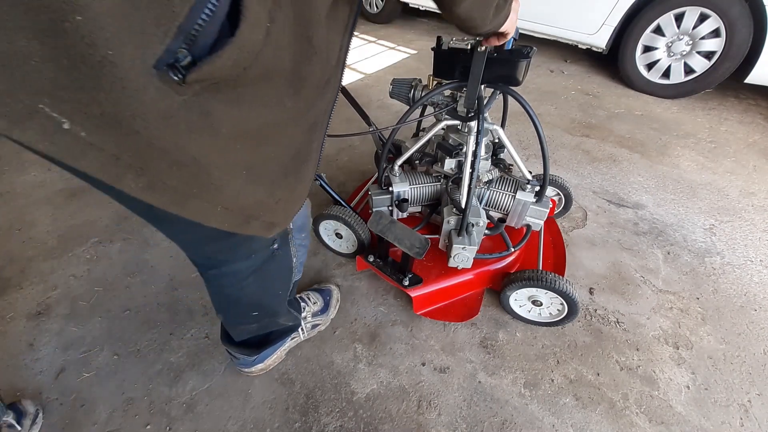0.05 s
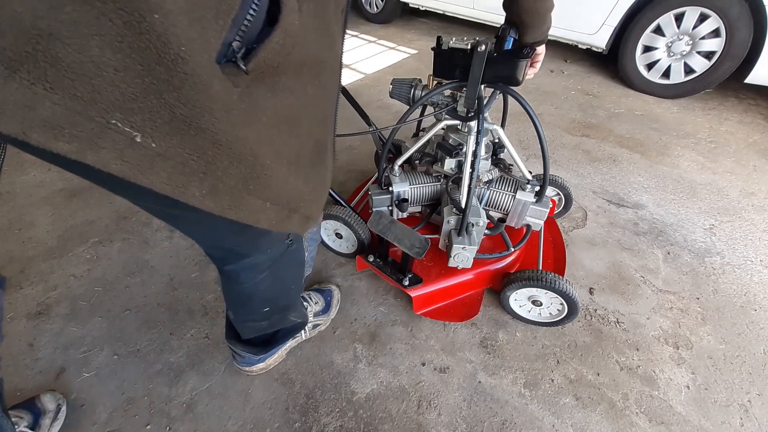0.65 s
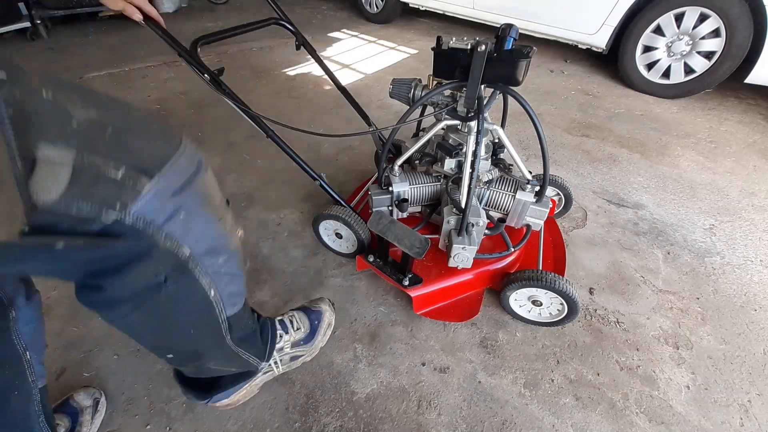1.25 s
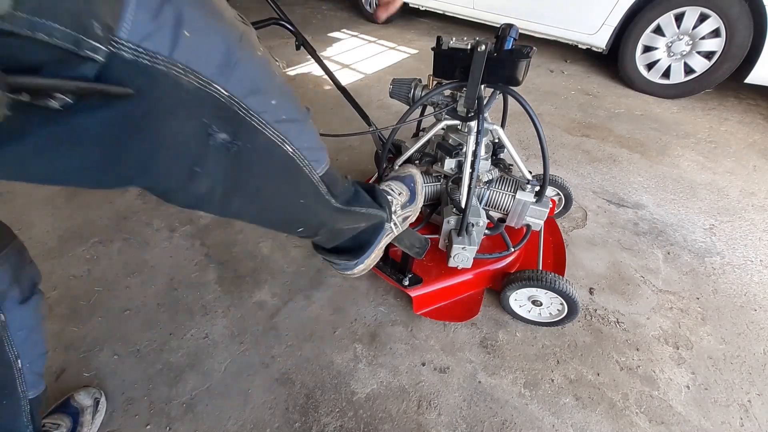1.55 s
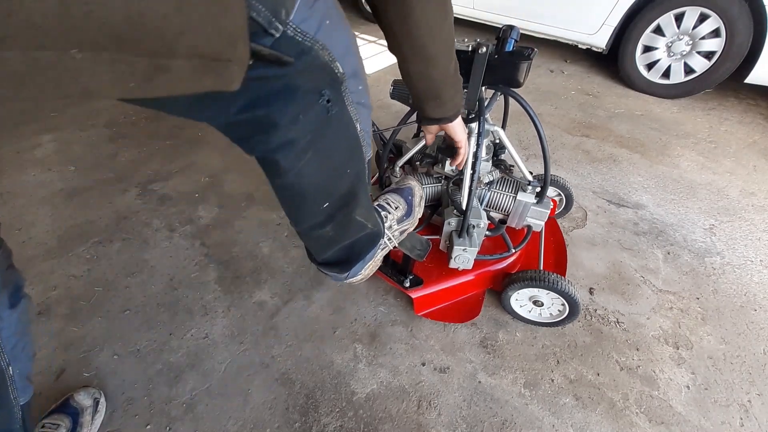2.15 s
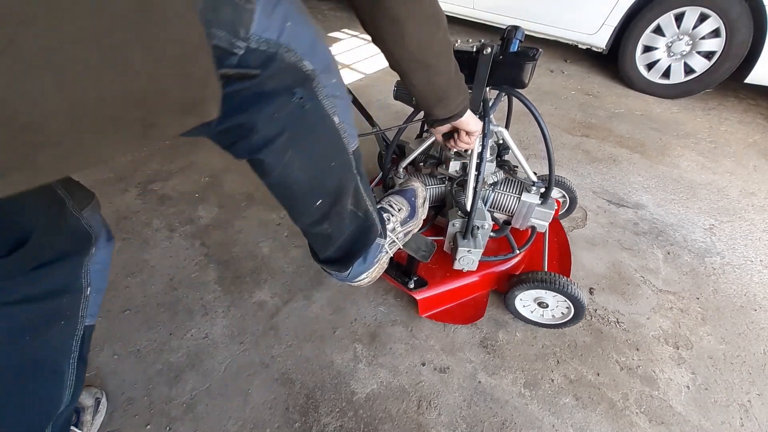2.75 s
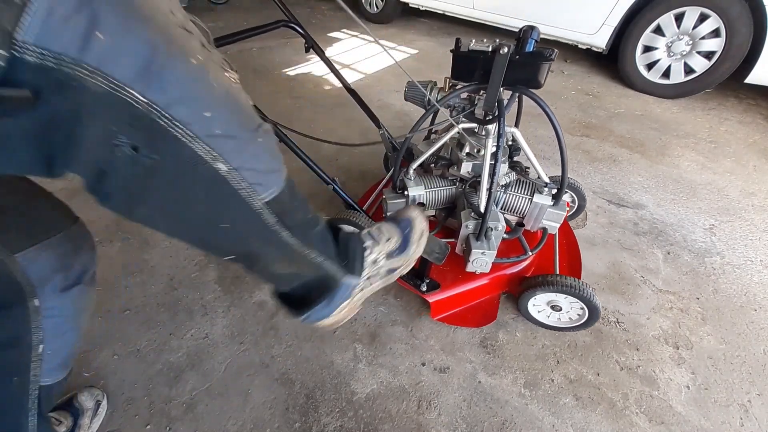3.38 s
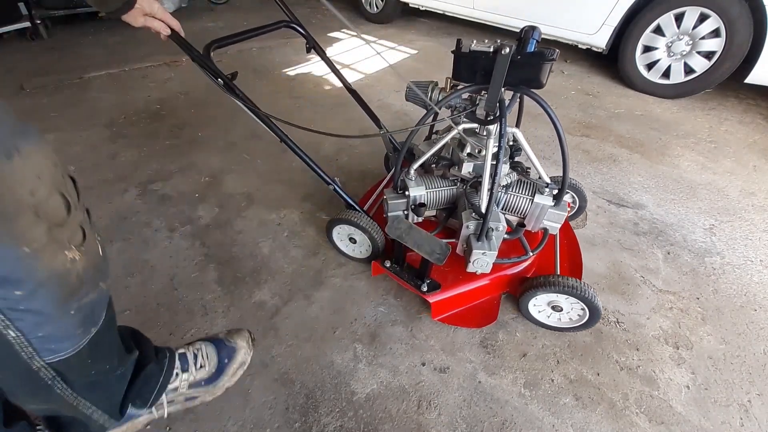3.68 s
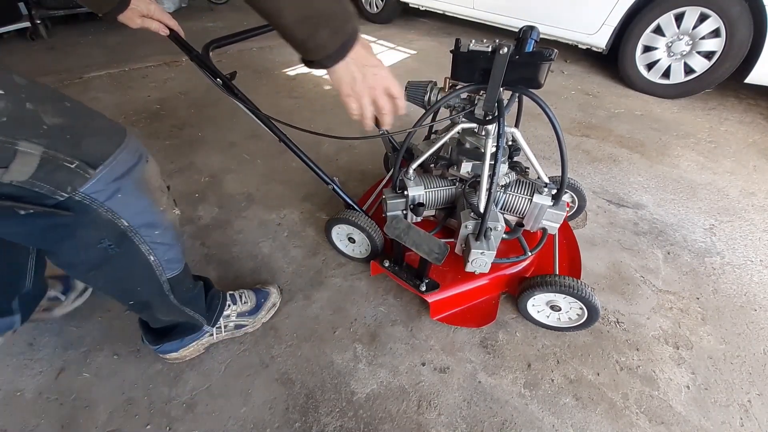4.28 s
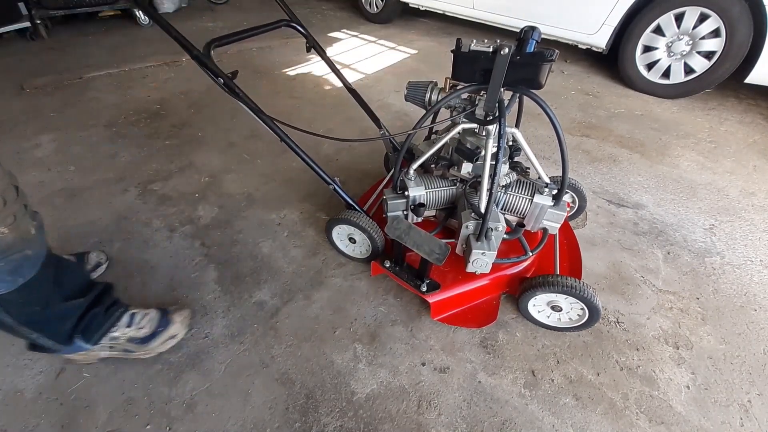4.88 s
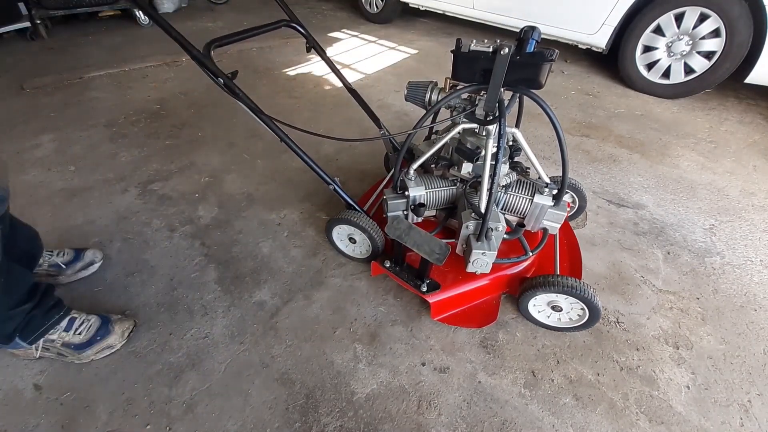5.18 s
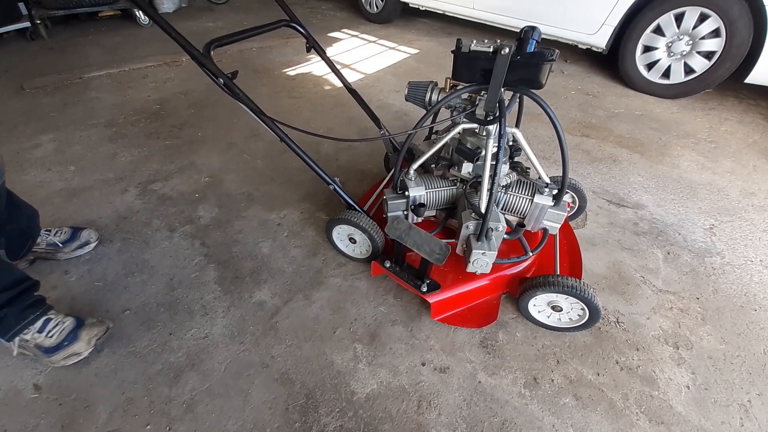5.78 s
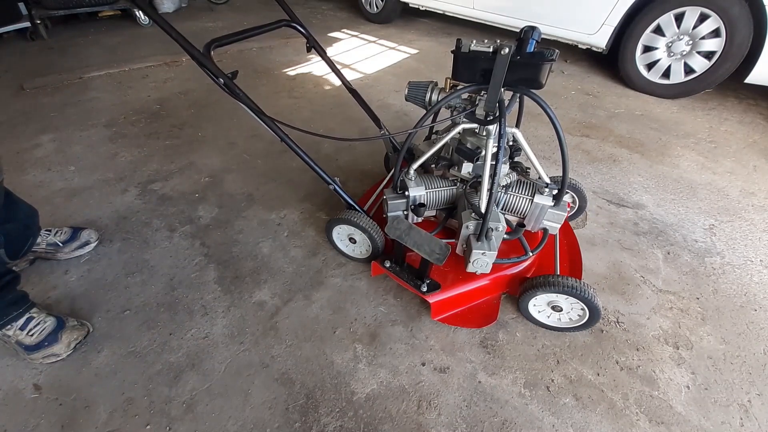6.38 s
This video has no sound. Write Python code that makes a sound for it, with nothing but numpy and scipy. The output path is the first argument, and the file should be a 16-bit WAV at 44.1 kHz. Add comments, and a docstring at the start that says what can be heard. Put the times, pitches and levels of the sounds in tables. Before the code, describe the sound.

A quiet garage with a faint hum opens with a small switch click at 0.1 seconds and soft clothing rustle. At 1 second a lawn mower's tubular handle clacks and rings briefly. Around 1.6 seconds a shoe lands on the steel deck with a light ringing knock. From 2.5 to 3 seconds the starter ticks and clinks as the slack is taken up, slightly to the left. The cord is drawn out with a rasping whizz until about 3.3 seconds, while the engine chuffs. Single loud firings start at around 3.1 seconds and come closer together. At 3.5 seconds the engine catches and climbs in speed, levelling off around 5 seconds into a loud, rapid, hissing clatter over a low drone. Concrete walls smear it into a wide roar, with irregular sharp bangs cutting through. It is still running at the end, near 6.6 seconds.

```python
"""Radial mower engine, pull-started in a garage.

A switch clicks, the handle clacks, a shoe lands on the steel deck and the starter cord is drawn out.
The homemade five-cylinder engine chuffs, fires single shots, catches and runs up on open exhaust
stubs, one cylinder weak. Bare concrete walls smear the firings into a roar over a rising drone;
a few hard firings bang through."""
import sys
import numpy as np
from scipy import signal
from scipy.fft import rfft, irfft, next_fast_len
from scipy.io import wavfile
from scipy.ndimage import map_coordinates

SR = 44100
rng = np.random.default_rng(int(sys.argv[2]) if len(sys.argv) > 2 else 0)


def wav_record(signal):
    """Record a signal, one row per channel, as 16-bit PCM in the file named by sys.argv[1]."""
    frames = np.transpose(np.atleast_2d(signal))
    bounded = np.clip(frames, -1, 1)
    # unit amplitude maps onto the largest positive 16-bit level
    quanta = np.round(bounded * 32767).astype(np.int16)
    wavfile.write(sys.argv[1], SR, quanta)


N = 292383
TIME = np.arange(N) / SR
FULL_RATE_HZ = 91.089  # firings at full speed
# compression strokes under the cord: t/s, puff/dB, f/Hz, t60/s, pulley rattle/dB
COMPRESSIONS = [(3.013, -23.5, 162, 0.1, -32), (3.041, -26, 195, 0.04, -40),
                (3.132, -14.5, 152, 0.043, -33), (3.138, -19.5, 574, 0.047, -22),
                (3.199, -16, 242, 0.058, -18.5), (3.216, -15.5, 300, 0.06, -15.5),
                (3.24, -10, 62, 0.043, -40), (3.274, -17.5, 224, 0.036, -38)]


def amp(db):
    """Decibels to gain."""
    return 10 ** (np.asarray(db) / 20)


def pan(db):
    """Stereo gains: left up, right down by db."""
    return amp([[db], [-db]])


def unit(x):
    """x at rms 1."""
    return x / np.sqrt(np.mean(x ** 2) + 1e-20)


def along(points, hz):
    """Interpolate (f/Hz, value) points on a log axis."""
    f, v = np.transpose(points)
    return np.interp(np.log(hz + 1), np.log(f + 1), v)


def fade_in(full_s, fade_s):
    """Linear ramp reaching 1 at full_s."""
    return np.clip(1 + (TIME - full_s) / fade_s, 0, 1)


def wobble(rate_hz):
    """Smooth random curve, rate_hz knots a second."""
    return map_coordinates(rng.standard_normal(int(N * rate_hz / SR) + 4), [TIME * rate_hz])


def dying(kicks, decay_s, rise_s=0.00001):
    """Rms envelope of a train of kicks, each swelling and dying away."""
    t = np.arange(SR // 2) / SR
    fall = np.exp(-2 * t / decay_s) * (1 - np.exp(-t / rise_s)) ** 2
    return np.sqrt(np.abs(signal.fftconvolve(kicks ** 2, fall / fall.sum())[:N]))


def swells(events, rise_s, t60_s):
    """Envelope of (t/s, level/dB) events that rise and decay alike."""
    ages = [(np.maximum(TIME - s, 0), db) for s, db in events]
    powers = ((amp(db - 60 * age / t60_s) * (1 - np.exp(-age / rise_s))) ** 2 for age, db in ages)
    return np.sqrt(sum(powers))


def add(track, s, sound):
    """Mix a sound into a track at time s."""
    part = track[..., max(round(s * SR), 0):][..., :sound.shape[-1]]
    part += sound[..., :part.shape[-1]]


def split(x, hz):
    """Low and high bands of x, equal in power at hz."""
    return [signal.sosfilt(signal.butter(2, hz, kind, fs=SR, output="sos"), x)
            for kind in ("low", "high")]


def coloured(x, db_of, size=8192):
    """Minimum-phase filter of unit energy, shaped by db_of(hz)."""
    db = db_of(np.fft.rfftfreq(size, 1 / SR))
    cepstrum = irfft(np.log(np.maximum(amp(db - db.max()), 1e-5)))
    cepstrum[1:size // 2] *= 2
    cepstrum[size // 2 + 1:] = 0
    h = irfft(np.exp(rfft(cepstrum)))
    return signal.fftconvolve(np.atleast_2d(x), h[None] / np.linalg.norm(h), axes=1)[:, :x.shape[-1]]


def wide_noise(size):
    """White stereo noise; bass spread wide, partly in antiphase."""
    # stereo width: f/Hz, left-right correlation
    correlation = [(60, -0.44), (130, 0.03), (290, 0.17), (640, 0.26), (1400, -0.0087), (15000, -0.019)]
    m = next_fast_len(size)
    angle = np.arccos(along(correlation, np.fft.rfftfreq(m, 1 / SR))) / 2
    mid, side = irfft(rfft(rng.standard_normal((2, m))) * [np.cos(angle), np.sin(angle)], m)
    return np.array([mid + side, mid - side])[:, :size]


def garage(x, wet_db, build_s=0.0029):
    """Source plus wall reverberation, a new tail for each position."""
    # room decay: f/Hz, t60/s
    decay = [(100, 0.68), (500, 0.85), (3000, 0.53), (8000, 0.74), (15000, 0.34)]
    hz, t, spectra = signal.stft(wide_noise(SR * 3 // 4), SR, nperseg=256)
    tail = signal.istft(spectra * amp(-60 * t / along(decay, hz)[:, None]), SR, nperseg=256)[1]
    tail *= 1 - np.exp(-(np.arange(tail.shape[1]) / SR / build_s) ** 2)
    tail /= np.linalg.norm(tail[0])
    return x + amp(wet_db) * signal.fftconvolve(np.atleast_2d(x), tail, axes=1)[:, :N]


def clacks(contacts, t60_s, knock_db):
    """Hard parts meet: short cracks, a dull knock below and a bright tick above."""
    # contact spectrum: f/Hz, level/dB
    colour = [(60, -9), (150, -10), (300, -14), (530, -1.5), (750, -4), (1200, -2.5), (1700, -3), (2750, 2),
              (4200, -5), (8000, -11.5), (13800, -17.5), (15800, -20)]
    track, t = np.zeros((2, N)), np.arange(SR // 6) / SR
    for s, db, bright_db in contacts:
        knock, rest = split(amp(db - 60 * t / t60_s) * wide_noise(len(t)), 2500)
        body, tick = split(rest, 7000)
        add(track, s, amp(knock_db) * knock - body + amp(bright_db) * tick)
    return garage(coloured(track, lambda hz: along(colour, hz)), wet_db=-4)


def struck(blows, modes, wet_db, attack_s):
    """Each blow rings the same modes; where it lands tilts them high or low."""
    track, t = np.zeros(N), np.arange(SR) / SR
    middle = np.mean([np.log2(hz) for hz, *_ in modes])
    for s, db, tilt in blows:
        ring = np.zeros(len(t))
        for hz, mode_db, t60_s in modes:
            start_db = mode_db + tilt * (np.log2(hz) - middle) + rng.normal(0, 0.84)
            ring += amp(start_db - 60 * t / t60_s) * np.sin(2 * np.pi * hz * t)
        add(track, s, amp(db) * (1 - np.exp(-t / attack_s)) * ring)
    return garage(track, wet_db)


def room_tone():
    """Quiet air, a wavering hum and a faint fading ring."""
    # room noise: f/Hz, level/dB
    ambient = [(15, -55), (30, -30), (47, 2.5), (86, -11), (133, -8.5), (241, -9.5), (284, -9.5),
               (542, -14), (587, -12.5), (791, -12), (1390, -18), (1780, -18.5), (15800, -51)]
    # hum tones, the close pair beating: f/Hz, level/dB
    hum_tones = [(84.5, -69.5), (74, -69.5), (167, -76.5)]
    # hum swell: t/s, level/dB
    hum_swell = [(0.1, 3), (0.4, -5), (0.8, -1), (1.25, 3.5), (1.65, -5), (2.0, 7), (2.45, 1.5), (2.85, -6)]
    # metallic tones: f/Hz, level/dB, t60/s
    ring_tones = [(1390, -67.5, 5.6), (580, -68.5, 18)]
    air = amp(-59) * coloured(wide_noise(N), lambda hz: along(ambient, hz))
    swell_db = 5.5 + np.interp(TIME, *np.transpose(hum_swell))
    hum = sum(amp(db + swell_db + 2.4 * wobble(4.6)) * np.sin(2 * np.pi * hz * TIME + 1.2 * wobble(5.7))
              for hz, db in hum_tones)
    ring = sum(amp(db - 60 * TIME / t60_s) * np.sin(2 * np.pi * hz * TIME + 0.83 * wobble(22))
               for hz, db, t60_s in ring_tones)
    return air + hum + ring


def clothes(still_db=-66):
    """Cloth rustles with each movement."""
    # movements: centre/s, half length/s, level/dB
    moves = [(.41, 0.13, -61.5), (0.716, .06, -63), (1.211, 0.13, -57), (1.912, 0.078, -54), (2.3, 1, -58)]
    # rustle spectrum: f/Hz, level/dB
    cloth = [(410, -41), (700, -15), (1100, -15), (1380, -7), (2230, -3), (4460, -4.5), (12000, -12),
             (15800, -9)]
    power = sum(amp(db) ** 2 * np.exp(-((TIME - s) / half_s) ** 2) for s, half_s, db in moves)
    level = np.sqrt(amp(still_db) ** 2 + power) * amp(0.8 * wobble(29.5))
    return level * coloured(wide_noise(N), lambda hz: along(cloth, hz))


def shoe():
    """A sole slaps the steel deck and sets it ringing."""
    # sole contact: t/s, level/dB, brightness/dB
    slap = [(1.645, -44.5, -1)]
    # landing and bearing down: t/s, level/dB, tilt/(dB/octave)
    steps = [(1.645, -50, 8), (1.6735, -45, 0), (2.56, -49, 5), (2.588, -51, 5), (2.925, -46, -7)]
    # deck modes: f/Hz, level/dB, t60/s
    deck = [(239.5, -1, 0.61), (251, -5, 0.33), (168, -12.5, 1.5), (293, 4.5, 0.13), (357, -2.5, 0.14),
            (535, -7, 0.072), (136, -7, .05)]
    return clacks(slap, t60_s=0.035, knock_db=5.5) + struck(steps, deck, wet_db=-8, attack_s=0.0013)


def handle(ring_db=-17):
    """The handle's tubes clack together and ring."""
    # tube contacts: t/s, level/dB, brightness/dB
    contacts = [(0.98, -35.5, -9), (.99, -37, -2), (1.0, -35.5, -1), (1.006, -36, 0), (1.011, -32.5, 8),
                (1.051, -43, 3), (1.06, -46.5, 19)]
    # tube modes: f/Hz, level/dB, t60/s
    tubes = [(134, -3, .12), (470, -3, .07), (537, 3, 0.18), (1203, -2.5, 0.27), (2400, -2, .09),
             (2700, 7, .08), (2840, 6, .07), (3110, 2, .1), (3600, -6, .13)]
    blows = [(s, db + ring_db, 0) for s, db, _ in contacts]
    return clacks(contacts, t60_s=0.053, knock_db=3.5) + struck(blows, tubes, wet_db=-3, attack_s=0.0008)


def ticks():
    """Switch, starter grip and pawls tick on contact."""
    # contacts: t/s, level/dB, brightness/dB
    contacts = [(.0805, -47, 13.5), (.106, -45, -5), (2.459, -50.5, 15), (2.566, -35, 2), (2.589, -38, 2),
                (2.663, -56, 24), (2.671, -43, 3), (2.709, -35, 6.5), (2.838, -62, 22), (2.847, -55, 19),
                (2.857, -58, 23), (2.866, -53.5, 26.5), (2.894, -41, 7), (2.93, -31, 3), (2.945, -35, 1),
                (2.963, -34, -6), (3.159, -33, 2), (3.225, -21.5, 1)]
    return clacks(contacts, t60_s=0.033, knock_db=-4)


def pawls():
    """The starter's steel pawls clink."""
    # strikes: t/s, level/dB, tilt/(dB/octave)
    clinks = [(2.589, -45, 18), (2.671, -49, 0), (2.709, -47, 0), (2.728, -46, -2), (2.894, -45, 0),
              (2.93, -43, 0), (2.944, -40, -3), (2.954, -39, -3), (2.964, -45, 0)]
    # pawl modes: f/Hz, level/dB, t60/s
    modes = [(2330, -12, .08), (2490, -3, 0.058), (2550, 1, .06), (2780, 2, 0.056), (2880, 3, 0.049),
             (3040, -3, 0.063), (3580, -6, .05), (4060, -4, 0.055)]
    return struck(clinks, modes, wet_db=-6, attack_s=0.00033)


def housing():
    """Knocks ring the hollow starter housing."""
    # strikes: t/s, level/dB, tilt/(dB/octave)
    knocks = [(2.459, -43, 7), (2.538, -48, -8), (2.552, -45, -18), (2.564, -50, -8), (2.648, -48, 2),
              (3.005, -29, 4)]
    # housing modes: f/Hz, level/dB, t60/s
    modes = [(785, -11, 0.13), (846, -3, 0.11), (970, -1.5, 0.1), (1135, 0, 0.09), (1220, 1, 0.058),
             (1348, 3, 0.068), (1400, -5, 0.12), (2000, -9, .06), (2160, -9, 0.044)]
    return struck(knocks, modes, wet_db=-4, attack_s=0.0022)


def starter(rough_db=3):
    """Cord and pulley grow louder with speed; compressions jolt the pulley and leak air."""
    # two draws take up slack, then the long pull: t/s, rise/s, fall/s, top speed/0-1
    pulls = [(2.52, 0.029, 0.089, 0.2), (2.61, 0.044, 0.094, 0.09), (2.83, 0.47, .05, 1)]
    # rumble, rasp and whizz: level at top speed/dB, speed exponent
    voices = [(-28.5, 1.12), (-32.5, 0.86), (-42, 0.76)]
    # air escaping past a valve: t/s, level/dB
    leaks = [(3.01, -32.5), (3.035, -32), (3.115, -27), (3.237, -29)]
    # spectra of pulley rumble, cord rasp and cord whizz: f/Hz, level/dB
    pulley_colour = [(120, -36), (200, -10), (392, -20), (545, -3), (609, -24), (667, -6), (919, -10),
                     (1330, -11), (1520, -16.5), (2200, -20.5), (2860, -60), (4840, -120)]
    rasp_colour = [(940, -33), (1600, -34), (2420, -7.5), (2620, -8), (2930, -5.5), (3770, -7),
                   (7000, -15.5), (9100, -51), (15400, -120)]
    whizz_colour = [(2650, -42), (4500, -16), (5610, 5), (6170, -7), (7490, 2.5), (10100, -3), (11700, 6.5),
                    (15800, -5)]
    speed = sum(top * np.interp(TIME, [s, s + rise_s, s + rise_s + fall_s], [0, 1, 0])
                for s, rise_s, fall_s, top in pulls)
    rumble, rasp, whizz = [amp(db) * np.abs(speed) ** power for db, power in voices]
    jolts = swells([(s, rattle_db) for s, *_, rattle_db in COMPRESSIONS], rise_s=0.0017, t60_s=0.1)
    air = swells(leaks, rise_s=0.0089, t60_s=0.76)
    levels = np.hypot(rumble, jolts), rasp, np.hypot(whizz, air)
    track = np.zeros((2, N))
    for level, colour in zip(levels, (pulley_colour, rasp_colour, whizz_colour)):
        rub = unit(wide_noise(N) * amp(rough_db * wobble(160)))
        track += level * coloured(rub, lambda hz: along(colour, hz))
    return track


def chuffs(rough_db=3.5, rise_s=0.0025, settle_s=0.0081):
    """Unlit cylinders push out soft, fluttering puffs as the cord turns the crank."""
    track, t = np.zeros(N), np.arange(SR // 4) / SR
    for s, db, hz, t60_s, _ in COMPRESSIONS:
        pitch_hz = hz * (1 + 0.15 * np.exp(-t / settle_s))
        envelope = amp(db + 3.5 - 60 * t / t60_s) * (1 - np.exp(-t / rise_s))
        add(track, s, envelope * np.sin(2 * np.pi * np.cumsum(pitch_hz) / SR))
    return garage(track * amp(rough_db * wobble(400)), wet_db=-8)


def exhaust_db(hz):
    """Broad spectrum of the open exhausts plus their pipe resonances."""
    # exhaust spectrum: f/Hz, level/dB
    broad = [(15, -22), (30, -9.5), (65, 4.5), (130, 2.5), (228, 1), (513, -1.5), (572, -3.5), (654, -2.5),
             (769, -2), (1550, -3), (1780, -4.5), (4820, -5.5), (9210, -12), (12100, -8.5), (14600, -8.5),
             (15800, -12)]
    # stub resonances: f/Hz, width/Hz, gain/dB
    stubs = [(233, 13, 3), (411, 29, 2), (580, 19, 5), (753, 17, 5), (1140, 95, 0.5), (1520, 60, 2),
             (11500, 650, 2)]
    peaks_db = sum(db / (1 + (2 * (hz - centre) / width) ** 2) for centre, width, db in stubs)
    return along(broad, hz) + peaks_db


def first_shots(rise_s=0.00094):
    """Single firings: noise bursts through the exhausts, dying away in the room."""
    # firings: t/s, level/dB, length/s
    shots = [(3.124, -23.5, 0.0077), (3.24, -12, 0.0019), (3.269, -12, 0.007), (3.304, -18, 0.009),
             (3.3912, -12.5, 0.0056), (3.418, -12.5, 0.0079), (3.473, -13.5, 0.005), (3.527, -15, 0.0072),
             (3.547, -16, 0.008), (3.573, -13.5, .005), (3.59, -17, 0.0067)]
    tilt = [(100, -4), (1000, -2.5), (5000, 1.5), (15000, 3)]  # f/Hz, gain/dB
    track, t = np.zeros((2, N)), np.arange(SR // 20) / SR
    for s, db, length_s in shots:
        envelope = amp(db + 5.5) * (1 - np.exp(-t / rise_s)) * np.exp(-(t / length_s) ** 2)
        add(track, s, envelope * rng.standard_normal((2, len(t))))
    return garage(coloured(track, lambda hz: exhaust_db(hz) + along(tilt, hz)), wet_db=-0.5)


def run_up(catch_s=3.5, catch_hz=44.744, run_up_s=0.8534, ease=1.424, hunt_hz=0.6, hunt_period_s=1.12):
    """Firing rate and firing count: from the catch the speed climbs and hunts slightly."""
    running_s = np.maximum(TIME - catch_s, 0)
    rate_hz = FULL_RATE_HZ - (FULL_RATE_HZ - catch_hz) * np.exp(-(running_s / run_up_s) ** ease)
    rate_hz -= hunt_hz * np.sin(2 * np.pi * running_s / hunt_period_s)
    return rate_hz, np.cumsum(rate_hz * (TIME > catch_s)) / SR


def drone(waver_db=3):
    """The firing rate and its octave as rising tones, left and right in antiphase."""
    # room response to the firing tones: f/Hz, level/dB
    boom = [(45, -37), (65, -31), (88, -33), (120, -38), (155, -38), (185, -47)]
    rate_hz, firings = run_up()
    tones = sum(amp(along(boom, k * rate_hz) + waver_db * wobble(7.5)) * np.sin(2 * np.pi * k * firings)
                for k in (1, 2))
    return np.sqrt(2) * tones * fade_in(3.56, 0.036) * pan(1) * [[1], [-1]]


def bangs(width_s=0.00016, half_span_s=0.001):
    """A charge burns hard and one steep pressure wave stands out of the roar."""
    # hard firings: t/s, level/dB
    hard_firings = [(3.654, -12), (3.676, -15), (3.7614, -9), (4.1117, -10), (4.3254, -7), (4.3928, -17),
                    (4.432, -22), (4.522, -18), (4.9481, -7), (5.1315, -9.5), (5.3367, -5.5), (5.393, -5),
                    (5.605, -12), (5.629, -22), (5.6717, -12), (5.727, -10), (5.8379, -12), (5.905, -10),
                    (6.004, -8.5), (6.1148, -19), (6.2253, -15), (6.3469, -5), (6.552, -10), (6.565, -10),
                    (6.607, -7.5)]
    track = np.zeros(N)
    u = np.linspace(-half_span_s, half_span_s, int(2 * half_span_s * SR)) / width_s
    wave = -u * np.exp((1 - u ** 2) / 2)
    for s, db in hard_firings:
        add(track, s - half_span_s, amp(db) * wave)
    return garage(track, wet_db=-2.5)


def valve_kicks(rate_hz, firings, jitter_s=0.00015, scatter_db=1.04):
    """One impulse per exhaust opening: pop train, gas-jet train and the pops with their echoes."""
    # four-stroke cycle: position/firing intervals, pop/dB, hiss/dB
    cylinders = [(.2, -5, 10), (1.21, 4, 12), (2.15, 8.5, 17.5), (3.23, 7.5, 13.5), (4.101, 0, 9.5)]
    cycles = np.arange(0, firings[-1], len(cylinders))
    cycle_db = 1.15 * np.diff(rng.standard_normal(len(cycles) + 1))  # strong tends to follow weak
    fronts, jets, echoes = np.zeros(N), np.zeros(N), np.zeros((2, N))
    for position, pop_db, hiss_db in cylinders:
        late, burn = rng.standard_normal((len(cycles), 2)).T
        open_s = np.interp(cycles + position, firings, TIME, right=TIME[-1] + 1) + jitter_s * late
        at = (open_s * SR).astype(int)
        pop_gain = amp(pop_db + cycle_db + scatter_db * burn)
        jet_gain = amp(hiss_db + 0.45 * cycle_db + scatter_db * burn)  # gas flow varies less
        kicks = np.bincount(at, pop_gain, N)[:N] / np.sqrt(rate_hz)
        fronts += kicks
        jets += np.bincount(at, jet_gain, N)[:N] / np.sqrt(rate_hz)
        echoes += garage(kicks, wet_db=6)  # each stub faces another wall
    return fronts, jets, echoes


def exhaust_pops(fronts, echoes, roar_s, burst_s=0.00064):
    """Turbulence makes every pop different, so most of the reverberation has no pitch."""
    # pop straight from its stub: f/Hz, level/dB
    bark = [(90, -14), (300, -3.5), (1000, 0), (1600, -0.5), (2600, 1.5), (8000, -5.5)]
    bursts = amp(-0.5 + 0.96 * wobble(70)) * dying(fronts, burst_s) * wide_noise(N)
    barks = coloured(echoes + bursts, lambda hz: along(bark, hz))
    roar = amp(10) * dying(fronts, roar_s) * wide_noise(N)
    return unit(barks * pan(1) + roar)


def gas_hiss(jets, doublings, roar_s, cross_hz, blow_s=0.0063, fizz_hz=7700):
    """Gas jets hiss and linger in the room; the top band wavers on its own."""
    envelope = np.hypot(dying(jets, blow_s, rise_s=0.0028), amp(10) * dying(jets, roar_s))
    hiss = split(unit(envelope * wide_noise(N)), cross_hz)[1]
    gas, fizz = split(hiss, fizz_hz)
    gas *= amp(0.5 * doublings + 0.55 * wobble(13) + 0.74 * wobble(500))
    fizz *= amp(-0.5 - 0.8 * doublings + 0.71 * wobble(15))
    shifted = np.imag(signal.hilbert(fizz, next_fast_len(N)))[:, :N]  # 90 degrees, so powers add
    return gas + shifted


def engine(roar_s=0.18, cross_hz=2600):
    """Each opening exhaust valve lets out a pop and a hissing jet; the walls pile them into a roar."""
    rate_hz, firings = run_up()
    doublings = np.log2(rate_hz / FULL_RATE_HZ)
    fronts, jets, echoes = valve_kicks(rate_hz, firings)
    pops = split(exhaust_pops(fronts, echoes, roar_s), cross_hz)[0] * amp(-18 + 2 * doublings)
    hiss = gas_hiss(jets, doublings, roar_s, cross_hz) * amp(-14.5) * pan(0.25)
    return coloured((pops + hiss) * fade_in(3.63, 0.25), exhaust_db)


def scene():
    """Handling sits to the left; the running engine fills the garage."""
    handling = clothes() + shoe() + handle() + ticks() + pawls() + housing() + starter()
    return (room_tone() + handling + chuffs()) * pan(1.8) + first_shots() + drone() + bangs() + engine()


def record(dry, low_hz=35, top_hz=16000):
    """Soft peak limiter, then bass roll-off and band limit."""
    limited = dry / (1 + np.abs(dry) ** 6) ** (1 / 6)
    m = next_fast_len(N + SR // 2)
    hz = np.fft.rfftfreq(m, 1 / SR)
    passband = np.clip((top_hz - hz) / 200, 0, 1) * hz ** 2 / np.sqrt(hz ** 4 + low_hz ** 4)
    return irfft(rfft(limited, m) * passband, m)[:, :N]


dry = scene()
out = record(dry)
wav_record(out)
```